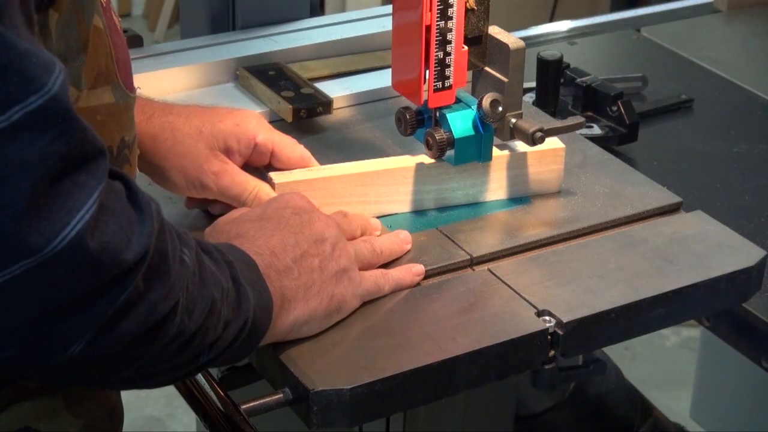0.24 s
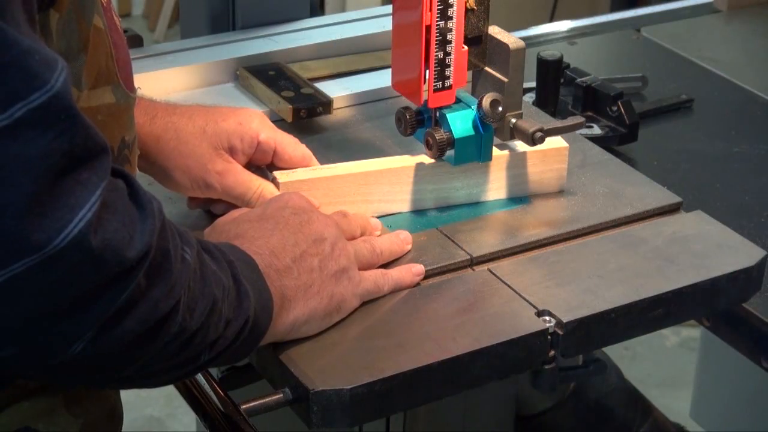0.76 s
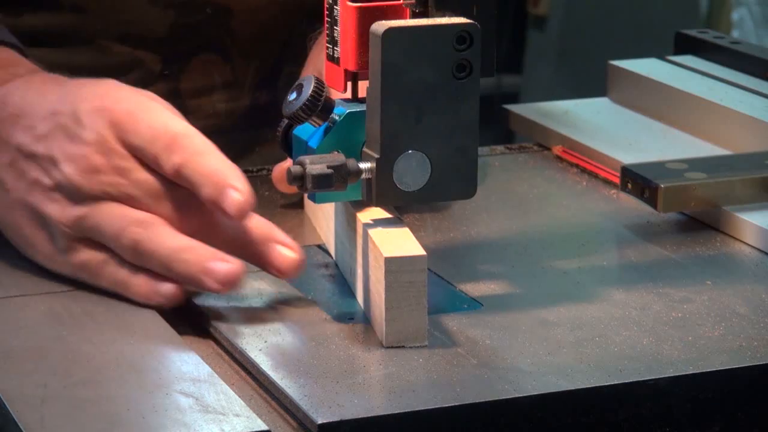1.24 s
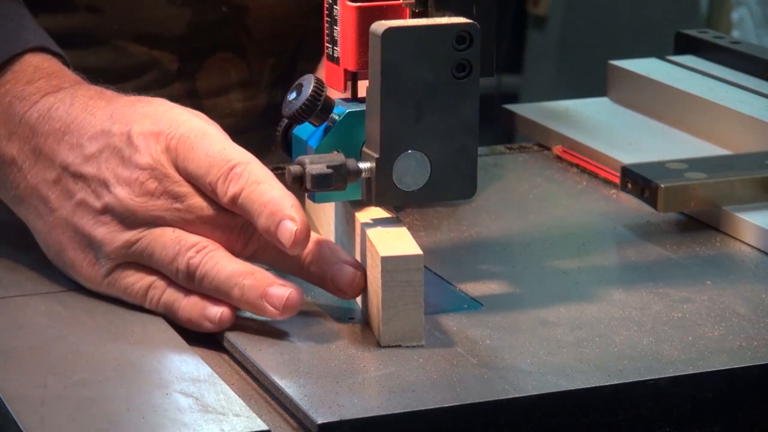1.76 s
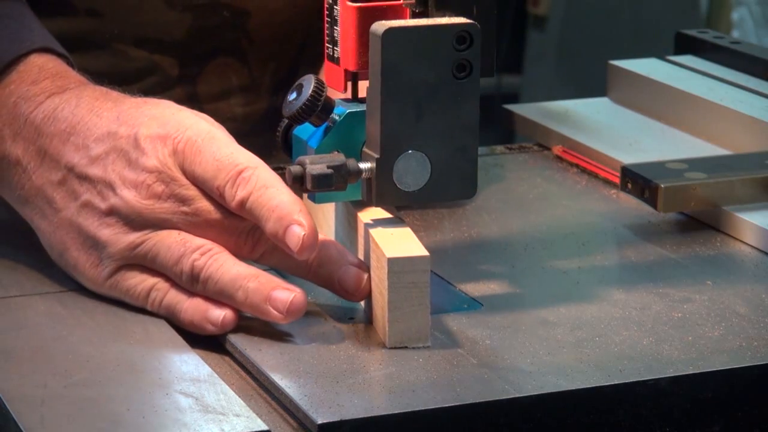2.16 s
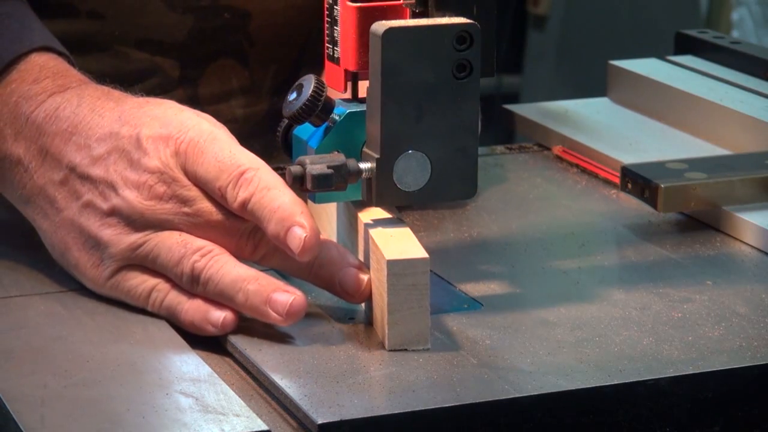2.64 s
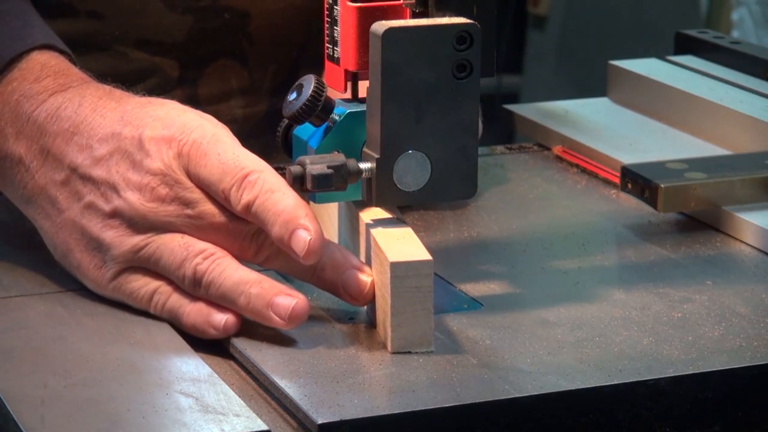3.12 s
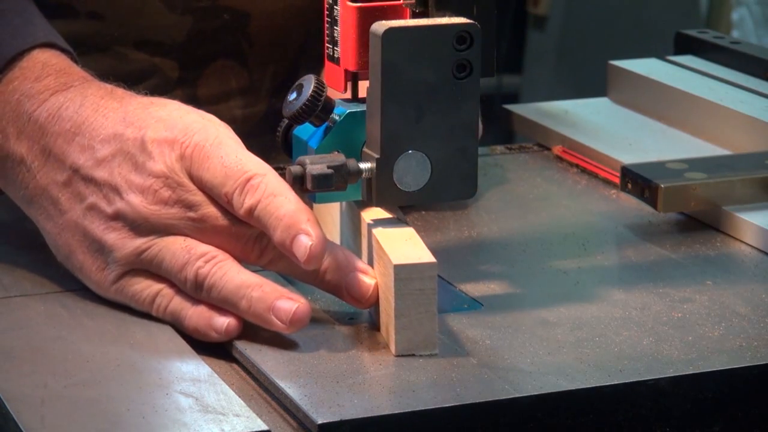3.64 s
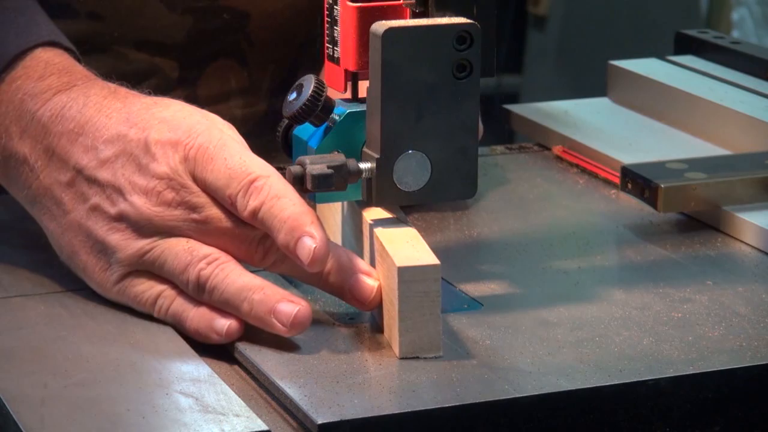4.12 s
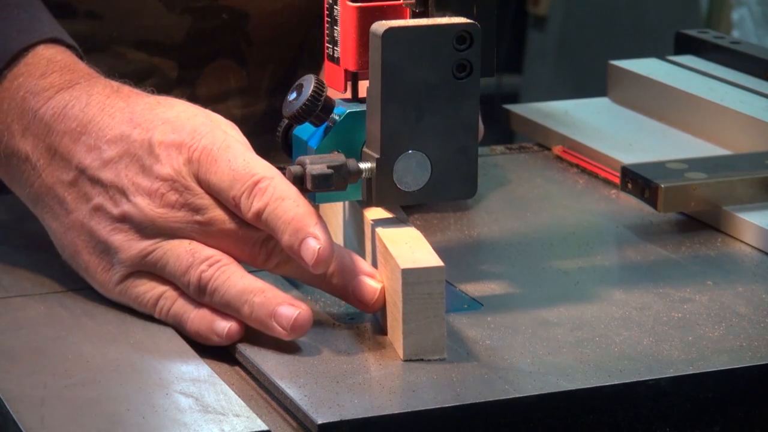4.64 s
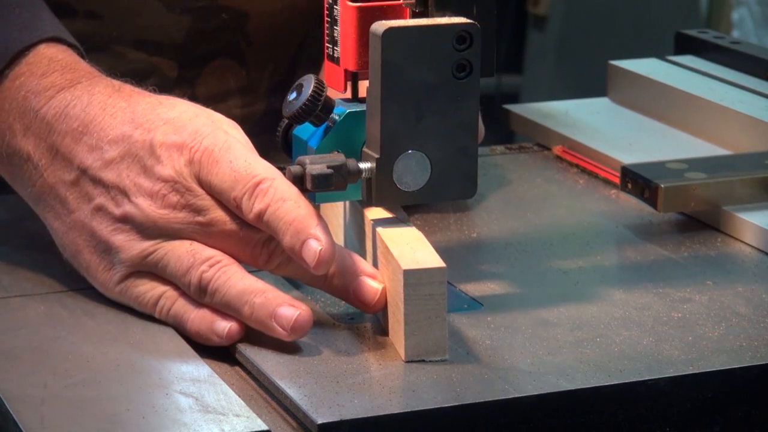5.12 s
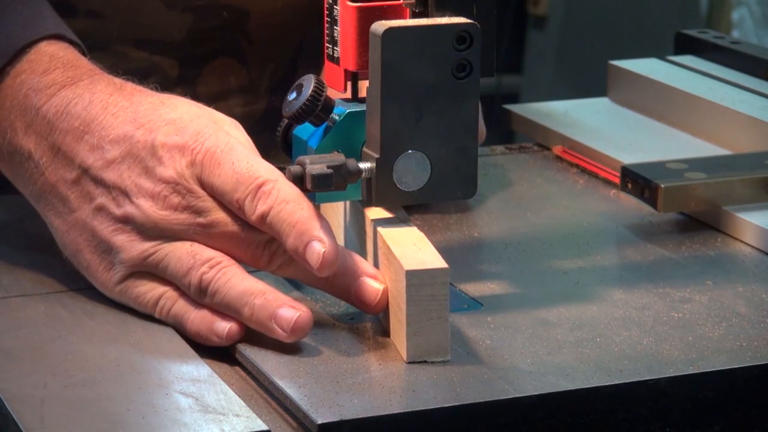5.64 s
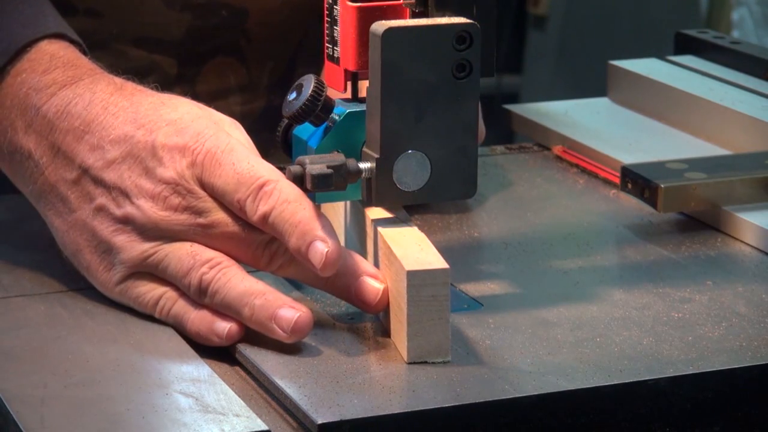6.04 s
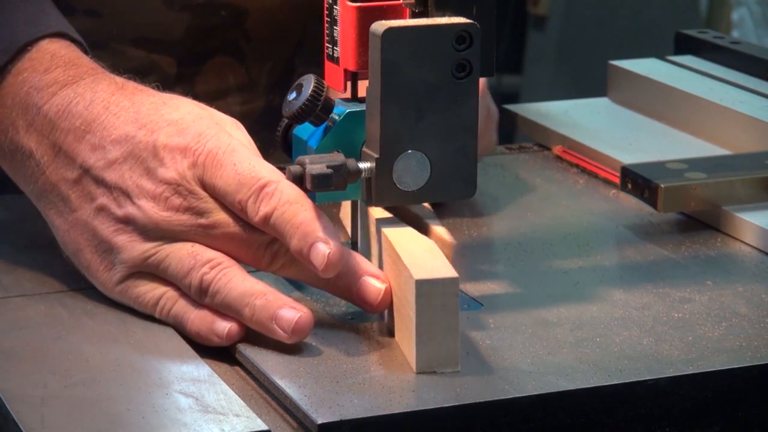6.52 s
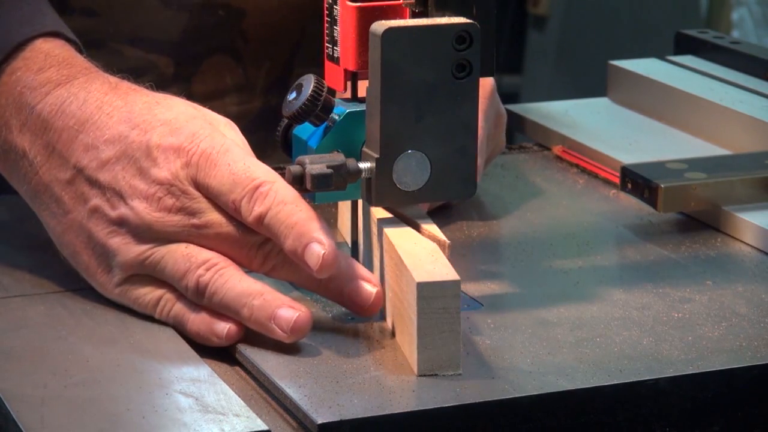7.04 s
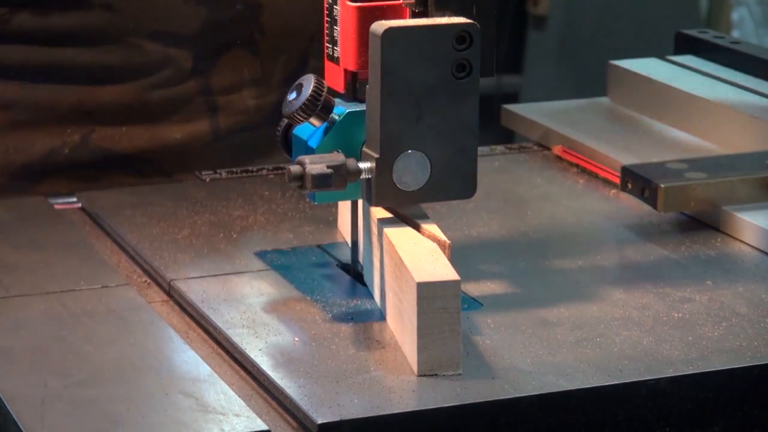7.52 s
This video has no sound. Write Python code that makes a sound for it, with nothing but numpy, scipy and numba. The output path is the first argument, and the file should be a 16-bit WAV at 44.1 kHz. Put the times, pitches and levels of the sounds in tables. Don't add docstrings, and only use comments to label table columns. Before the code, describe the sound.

A bandsaw is already cutting a wooden block in a workshop, heard close to the table. From 0 to 1.4 seconds a hard, shrill whine a little above 1.2 kHz, with bright overtones, rides over dense tearing hiss and a low-level motor hum. Around 1.4 seconds the sound switches to another perspective; the cut is lighter and the motor shows through more. From about 2.1 seconds the feed firms up and a rough blade chatter beats just beneath the whine, with faint guide squeal and crisp fibre hiss. Between 4.9 and 6.4 seconds the cut gradually eases, with faint low thrums from the loosening wood. Near 6.6 seconds the whine and tearing stop, a short dry knock marks the offcut dropping, and the unloaded saw hums and whirrs with airy hiss, softening slightly until the end near 7.8 seconds.

```python
import sys
import numpy as np
from scipy import signal
from scipy.fft import rfft, irfft, next_fast_len
from scipy.io import wavfile
from scipy.ndimage import uniform_filter1d
from numba import njit

SR = 44100
rng = np.random.default_rng(int(sys.argv[2]) if len(sys.argv) > 2 else 0)


def transcribe(signal):
    frames = np.atleast_2d(signal).T
    limited = np.clip(frames, -1, 1)
    pcm = np.round(limited * 32767).astype(np.int16)
    wavfile.write(sys.argv[1], SR, pcm)


def volts(x):
    e = np.asarray(x, float) / 20
    return 10 ** e


N = 343083
T = np.arange(N) / SR
JOIN_S, CUT_ENDS_S = 1.45, 6.585


def curves(table):
    s, *columns = np.transpose(table)
    return [np.interp(T, s, c) for c in columns]


def unit(x):
    return x / np.sqrt(np.mean(np.abs(x) ** 2))


def gain_at(hz, points):
    f, db = np.transpose(points)
    return volts(np.interp(np.log(hz + 1), np.log(f), db))


def noise(shape):
    size = next_fast_len(N)
    spectrum = rfft(rng.standard_normal(size))
    f = np.arange(size // 2 + 1) * SR / size
    return unit(irfft(spectrum * shape(f), size)[:N])


def walk(rate_hz):
    return noise(lambda f: f / (f + 0.16) / (1 + (f / rate_hz) ** 2))


@njit
def svf(x, hz, width):
    y, b, l = np.empty(len(x)), 0., 0.
    for i in range(len(x)):
        g, k = np.tan(np.pi * hz[i] / SR), width / hz[i]
        v = (b + g * (x[i] - l)) / (1 + g * (g + k))
        b, l, y[i] = 2 * v - b, l + 2 * g * v, k * v
    return y


def band_noise(hz, width_hz, second_width_hz):
    once = svf(rng.standard_normal(N), hz, width_hz)
    return unit(svf(once, hz, second_width_hz))


def closing(end_s, length_s):
    return np.clip((end_s - T) / length_s, 0, 1)


# start_s, level_db
FEED_PRESSURE = [(0.0, -29.5), (0.15, -28.5), (0.85, -27), (1.1, -28), (1.46, -37.5), (1.7, -33.5),
                 (1.82, -35), (2.0, -33.5), (2.15, -28.5), (3.24, -28), (3.85, -29), (4.55, -29),
                 (4.92, -31), (5.6, -33), (6.09, -35), (6.3, -34.5), (6.42, -34.5), (6.54, -37)]


def feed_db():
    firm_db = -30
    return curves(FEED_PRESSURE)[0] - firm_db


def follow(law, first_extra_db=0, second_extra_db=0):
    first_db, second_db, share, per_s = law
    fade_out_s, fade_db_per_s, fade_in_s, midway_s = 1.358, -170, 0.15, 4
    feed = feed_db()
    held_feed = np.interp(np.minimum(T, 1.1), T, feed)
    dying_db = fade_db_per_s * np.clip(T - fade_out_s, 0, None)
    first = volts(first_db + first_extra_db + held_feed + dying_db)
    second = volts(second_db + second_extra_db + share * feed + per_s * (T - midway_s))
    second = second * np.clip((T - fade_out_s) / fade_in_s, 0, 1)
    return 10 * np.log10(first ** 2 + second ** 2)


def swells(rows):
    return sum(db * np.exp(-((T - s) / length) ** 2) for s, length, db in rows)


# start_s (centre), length_s, level_db, partial
PARTIAL_SWELLS = [(1.25, 0.26, -7, 4), (.38, .15, 3, 1), (.8, .15, 3, 4), (1.15, .12, 5, 7), (1.55, .1, 5, 1),
                  (1.62, .12, 4, 3), (6.52, .04, 6, 2), (6.57, .07, -12, 3), (6.53, .04, 5, 4),
                  (1.4, .05, -8, 1), (1.92, 0.055, 17.5, 3), (1.98, .1, 9, 6), (1.95, 0.058, -11, 1),
                  (2.15, .12, 2.5, 7), (2.7, .2, 11.5, 4), (3.25, 0.13, 7.5, 7), (3.58, 0.071, 4, 7),
                  (3.6, 0.11, 4, 6), (4.0, 0.18, 5, 2), (4.1, 0.35, 5, 7), (4.5, 0.13, 3.5, 4),
                  (4.5, 0.33, 4.5, 6), (5.75, 0.096, -6, 7), (5.9, 0.18, 6.5, 2), (6.3, 0.26, 2.5, 3),
                  (6.3, .3, 3, 4), (6.42, 0.19, 12, 5), (6.42, 0.16, 7, 7)]


def knots(partial):
    return swells(row[:3] for row in PARTIAL_SWELLS if round(row[3]) == partial)


# start_s, pitch_hz
TOOTH_RATE = [(0, 1233.4), (1.4, 1233), (1.46, 1248), (1.9, 1248.6), (2.1, 1245.6), (2.25, 1241),
              (2.5, 1239), (3.6, 1237.7), (4.5, 1238.7), (5.1, 1242.8), (5.6, 1243.3), (6.4, 1244.6),
              (6.62, 1246)]


def tooth_turn():
    return np.exp(2j * np.pi * np.cumsum(curves(TOOTH_RATE)[0]) / SR)


TOOTH_WAVER = [.095, .075]
# first_level_db, second_level_db, feed_share (dB per dB), advance (dB per s)
TOOTH_LAWS = [(-31, -37, 0.5, 2.2), (-42.5, -49, -0.8, 1.5), (-34.5, -46.5, 1.6, 2.9),
              (-46, -42.5, 0.3, 0.3), (-48, -56.5, -0.3, 2.5), (-51.5, -52.5, 0.2, 0.1),
              (-48.5, -45, 1, 2.5)]


def teeth(turn):
    rough = np.where(T < JOIN_S, *TOOTH_WAVER)
    out = 0
    for k, law in zip((1, 3, 4, 7, 2, 5, 6), TOOTH_LAWS):
        db = follow(law) + knots(k)
        waver = 1 + rough * np.sqrt(k) * (walk(rate_hz=13.0) + 1j * walk(rate_hz=24))
        steady_power = np.sqrt(2 / (1 + 2 * k * rough ** 2))
        leaving = closing(CUT_ENDS_S + .08, .15) ** (.8 * k)
        out = out + leaving * volts(db - .6) * steady_power * np.real(waver * turn ** k)
    return out


# start_s, pitch_hz, level_db
CHATTER_PATH = [(0.0, 1166, -43.5), (1.2, 1178, -44.5), (1.45, 1200, -40.5), (1.68, 1110, -45),
                (1.95, 1121, -36), (2.25, 1195, -28.5), (2.68, 1170, -32), (3.0, 1191, -31),
                (3.52, 1203, -31), (3.66, 1157, -30), (4.58, 1160, -28.5), (4.76, 1130, -29),
                (5.0, 1172, -32.5), (5.4, 1155, -35), (5.55, 1186, -33.5), (5.85, 1215, -38),
                (6.15, 1197, -37.5), (6.6, 1113, -41)]
# pitch_hz, level_db
BLADE_MODES = [(1095, -6), (1132, -7), (1160, 0), (1172, -2), (1196, 0), (1212, -3)]
# start_s (centre), length_s, level_db
OFFCUT_THRUMS = [
    (1.8, .2, 3),
    (2.2, .12, 4),
    (3.5, 0.092, 2),
    (4.15, 0.11, 7),
    (5.1, 0.11, 11.5),
    (5.38, .12, 17.5),
    (5.78, 0.14, 16.5),
    (6.25, .15, 7),
]


def chatter(turn):
    hz, db = curves(CHATTER_PATH)
    whole = 0
    for mode_hz, mode_db in BLADE_MODES:
        sway = 1 + .35 * (walk(rate_hz=8) + 1j * walk(rate_hz=8))
        near = volts(mode_db) / (1 + ((mode_hz - hz) / 18.3) ** 2)
        phase = 2 * np.pi * mode_hz * T + 1.17 * walk(rate_hz=2.7)
        whole = whole + near * sway * np.exp(1j * phase)
    whole = whole / np.sqrt(uniform_filter1d(np.abs(whole) ** 2, size=SR // 4) / 2)
    rustle = band_noise(hz, 91.0, 140.0)
    mirror = np.real(np.conj(whole) * turn ** 2)
    blade = np.real(whole) + volts(-5.5) * rustle + volts(-16) * mirror
    out = volts(db - 1.5 - 3.6 * (T < 1.9)) * blade

    guide_db = db - 14.0 + .8 * feed_db()
    guide_hz = 2440 + 3.0 * walk(rate_hz=1.48)
    guide_sway = 1 + 0.55 * (walk(rate_hz=11) + 1j * walk(rate_hz=30))
    guide = np.real(guide_sway * np.exp(2j * np.pi * np.cumsum(guide_hz) / SR))
    out += volts(guide_db + 2.5) * guide

    block_db, block_hz = -62 + swells(OFFCUT_THRUMS), 372
    out += volts(block_db + 0.5) * noise(lambda f: 1 / (1 + ((f - block_hz) / 3.5) ** 2))
    return out * closing(CHATTER_PATH[-1][0], 0.083)


# law (0-3), pitch_hz, width_hz, drift (Hz per Hz of chatter),
# first_level_db, second_level_db
FIBRE_RINGS = [(0, 1005, 158, 1.5, -7.5, -11.5), (0, 2372, 151, 3, -15, -9), (0, 3565, 300, 3.5, -18, -2),
               (0, 3672, 118.5, -1, -0.5, -8), (0, 3920, 364, -5, -2, -14), (1, 4480, 297, -2.5, -4, 1),
               (2, 4849, 152, 0, -11, 1), (2, 4912, 69, 0, -1, -10), (2, 5056, 343, -6, -6, -24),
               (2, 6103, 196, -0.5, -12, -10), (3.001, 7350, 280, -0.5, -7, -4.5),
               (3.001, 7930, 300, 3, -29, -8.5), (3, 8530, 446, 2.5, -11, 0.5),
               (3, 8715, 90, -0.5, -1, -8.5)]
# first_level_db, second_level_db, feed_share (dB per dB), advance (dB per s)
FIBRE_LAWS = [(-42, -39.5, 1.38, -0.8), (-47, -44.5, 0.44, -3.5), (-35, -44.5, 2.73, -3),
              (-47.5, -38.5, 1.44, 0.54)]


def tear():
    shift_hz = np.clip(curves(CHATTER_PATH)[0] - 1175, -35, 30) * (T > 2.05)
    stirred_db = [.3 * knots(partial) for partial in (3, 0, 4, 7)]
    out, bite = 0, 1.3 * walk(rate_hz=5)
    for c, hz, width_hz, drift, first_db, second_db in FIBRE_RINGS:
        ring = band_noise(hz + drift * shift_hz, 1. * width_hz, 1.48 * width_hz)
        db = follow(FIBRE_LAWS[int(c)], first_db, second_db) + stirred_db[int(c)]
        out = out + volts(db + bite + 1.0 * walk(rate_hz=23)) * ring
    return out * closing(CUT_ENDS_S, 0.093)


# start_s, level_db (casing)
CASING_GAIN = [(0.0, -49), (0.04, -48), (1.49, -45.5), (1.9, -37.5), (2.21, -38.5), (2.27, -44.5),
               (3.83, -46.5), (5.03, -44), (5.13, -45), (5.18, -42), (6.76, -37.5), (6.96, -34),
               (7.34, -34.5), (7.37, -35.5), (7.76, -36), (7.78, -40)]
HISS_CENTRES = [1750, 2770, 5500, 9150]
# pitch_hz, level_db (per Hz)
HISS_COLOUR = [(180, -63), (300, -24), (528, -18), (1140, -16), (1220, -5), (1360, -10.5), (2920, -18),
               (3800, -18.5), (4260, -22), (5000, -18), (5610, -25.5), (8800, -19.5), (9600, -20),
               (12500, -56), (21100, -120)]
# first_level_db, second_level_db, feed_share (dB per dB), advance (dB per s)
HISS_LAWS = [(-42, -41.5, 0.49, -0.5), (-45.5, -46, 0.28, 0.71), (-44, -42, 0.51, 0.059),
             (-41.5, -42.5, 1.01, .1)]
FREE_BLADE_HISS = [-44, -59.5, -50.5, -53.5]


def hiss():
    out, bite = 0, 1.0 * walk(rate_hz=6)
    cutting = closing(CUT_ENDS_S, .08)
    lift_db = curves(CASING_GAIN)[0] + 35
    thin_db = -4 * np.clip((T - 6.2) / .2, 0, 1)
    dust_db = -6 * np.clip(T - 7.15, 0, None)
    rows = zip(HISS_LAWS, FREE_BLADE_HISS, [1.5, 1.7, 3.15, 1.2])
    for k, (law, idle_db, wide_db) in enumerate(rows):
        cut = cutting * volts(follow(law) + thin_db)
        idle = volts(idle_db + 0.56 * lift_db + (k > 1) * dust_db)
        share = np.eye(4)[k]

        def shape(f):
            overlap = np.sqrt(np.interp(np.log(f + 1), np.log(HISS_CENTRES), share))
            return gain_at(f, HISS_COLOUR) * overlap * (f > 280)

        flicker = volts(wide_db + bite + 1.0 * walk(rate_hz=25))
        out = out + np.hypot(cut, idle) * flicker * noise(shape)
    return out


# pitch_hz, level_db
SHAFT_LINES = [(226.0, -56), (300.5, -58), (450.2, -55), (475.5, -46), (500.4, -44), (525.7, -38),
               (550.2, -42), (575.1, -44), (600.9, -48), (625.1, -46), (798.2, -53), (824.0, -51),
               (874.4, -50), (900.7, -50), (924.0, -47), (998.8, -45), (1024.3, -46), (1074.0, -56),
               (1098.9, -40), (1123.8, -48), (1148.7, -45), (1175.2, -52), (1198.8, -53), (1248.7, -49),
               (1299.1, -49)]
# pitch_hz, level_db (per Hz)
AIR_RUSH = [(15, -72), (25, -61), (80, -32.5), (129, -32), (229, -7), (288, -16), (406, -12.5), (521, -6),
            (607, -1.5), (734, -7), (906, -6.5), (1280, -5), (1410, -12.5), (1870, -12.5), (2400, -43),
            (3120, -62.5), (5280, -120)]


def motor():
    casing_db = curves(CASING_GAIN)[0] + 0.67
    rumble_db = -47 + 0.57 * (casing_db + 40.5)
    deep_db = -66.5 + 0.28 * (casing_db + 41)
    unloaded_db = .6 * (casing_db + 34.5)
    lines = 0
    for hz, db in SHAFT_LINES:
        sway_db = 1.3 * walk(rate_hz=1.5)
        line_db = db + 35.5 - 2.5 * (T < JOIN_S) + sway_db + (hz > 700) * unloaded_db
        lines = lines + volts(line_db) * np.sin(2 * np.pi * (hz * T + rng.random()))
    upper = noise(lambda f: gain_at(f, AIR_RUSH) / (1 + (400 / (f + 1)) ** 6))
    lower = noise(lambda f: gain_at(f, AIR_RUSH) / (1 + (f / 400) ** 6) / (1 + (160 / (f + 1)) ** 8))
    deep = noise(lambda f: gain_at(f, AIR_RUSH) / (1 + (f / 160) ** 8))
    whistle = noise(lambda f: 1 / (1 + ((f - 8050) / 350) ** 2))
    casing = volts(casing_db) * (lines + volts(-2.5) * upper + volts(-22) * whistle)
    return casing + volts(rumble_db - 1.7) * lower + volts(deep_db + 4.5) * deep


# start_s, level_db (peak), pitch_hz, t60_s
OFFCUT_DROPS = [
    (6.6185, -24.5, 1540, 0.053),
]


def ticks():
    out = np.zeros(N)
    crack_hz = np.full(N, 3000.)
    for s, db, hz, t60 in OFFCUT_DROPS:
        t = np.clip(T - s, 0, None)
        fade = (T >= s) * np.exp(-np.log(1000) * t / t60)
        crack = svf(svf(fade ** 6.0 * rng.standard_normal(N), crack_hz, 2600.), crack_hz, 3200.)
        rings = 0.51 * np.sin(2 * np.pi * hz * t) + 0.34 * np.sin(2 * np.pi * 1.68 * hz * t)
        out += volts(db) * (fade * rings + 2.0 * crack)
    return out


def scene():
    turn = tooth_turn()
    return (teeth(turn) + chatter(turn) + tear() + hiss() + motor() + ticks())[None]


def top_cut(x):
    return signal.sosfilt(signal.butter(12, 10450, fs=SR, output="sos"), x)


# pitch_hz, width_hz
QUIET_BANDS = [(2720, 160), (2900, 180), (3050, 140), (6850, 200)]


def record(dry):
    top_hz = 9650
    size = next_fast_len(N)
    tone, f = rfft(dry, size), np.arange(size // 2 + 1) * SR / size
    out = irfft(tone * np.clip((top_hz + 30 - f) / 80, 0, 1) ** 3, size)[:, :N]
    loud = np.clip((curves(CHATTER_PATH)[1] + 40) / 10, .5, 1)
    for hz, width_hz in QUIET_BANDS:
        gone = uniform_filter1d(1. * (walk(rate_hz=9) * loud > .8), size=600)
        band = irfft(tone * (np.abs(f - hz) < width_hz / 2), size)[:, :N]
        out = out - gone * band
    return top_cut(out)


dry = scene()
out = record(dry)
transcribe(out)
```